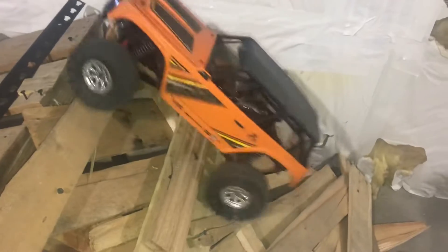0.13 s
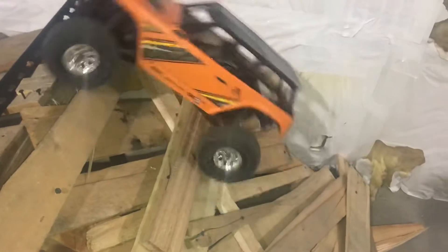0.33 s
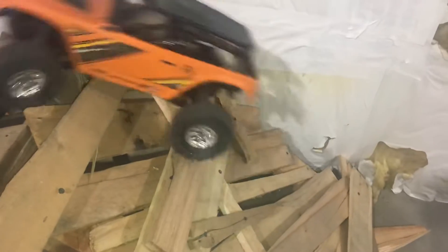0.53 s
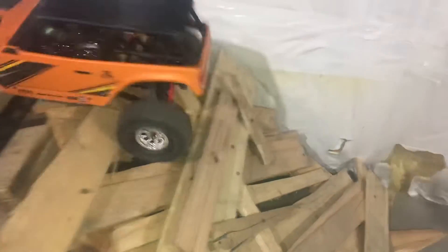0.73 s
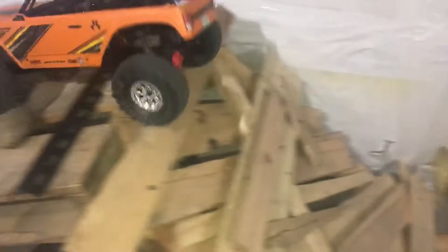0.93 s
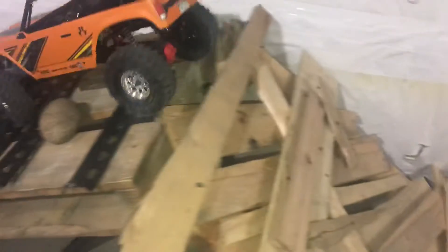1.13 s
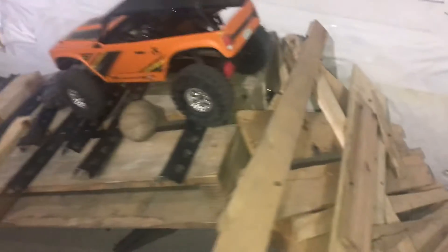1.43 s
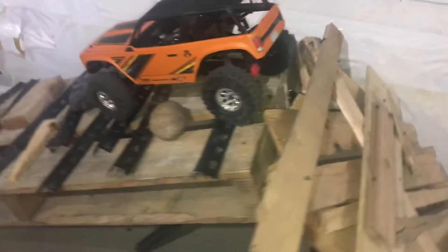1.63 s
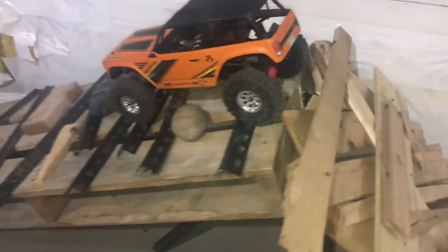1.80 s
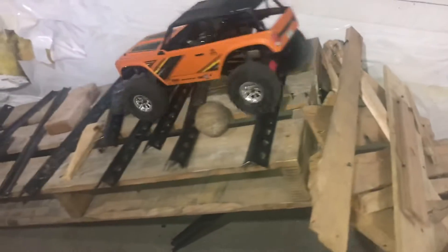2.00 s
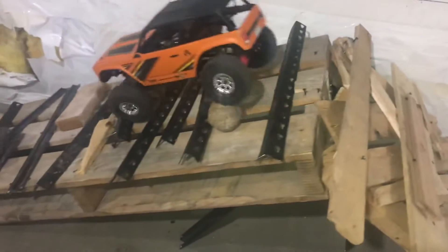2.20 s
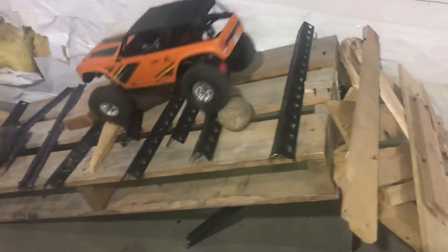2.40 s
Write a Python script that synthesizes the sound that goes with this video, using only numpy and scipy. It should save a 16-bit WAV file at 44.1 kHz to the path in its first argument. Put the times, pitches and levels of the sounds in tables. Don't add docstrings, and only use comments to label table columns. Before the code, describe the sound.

A toy crawler's electric motor and gears whine in rough surges, then wind down amid clattering knocks on wood; after a near-quiet pause, a servo twitches and the motor restarts with more knocks, close in a basement.

```python
import sys
import numpy as np
from scipy import signal
from scipy.fft import rfft, irfft
from scipy.io import wavfile
from scipy.ndimage import uniform_filter1d

SR = 44100
rng = np.random.default_rng(int(sys.argv[2]) if len(sys.argv) > 2 else 0)


def inscribe(sig):
    pcm = np.round(np.clip(np.atleast_2d(sig).T, -1, 1) * 32767)
    wavfile.write(sys.argv[1], SR, pcm.astype(np.int16))


def elevation(decibels):
    levels = np.asarray(decibels, float)
    return 10 ** (levels / 20)


N = 112454
T = np.arange(N) / SR


def evened(x):
    return x / np.sqrt(np.mean(x ** 2) + 1e-20)


def shaped(x, points):
    point_hz, db = np.transpose(points)
    hz = np.fft.rfftfreq(len(x), 1 / SR)
    gain_db = np.interp(np.log(hz + 1), np.log(point_hz + 1), db)
    return irfft(rfft(x) * elevation(gain_db), len(x))


def band(x, lo_hz, hi_hz):
    edges_hz = [lo_hz, min(hi_hz, SR * .49)]
    return signal.sosfilt(signal.butter(2, edges_hz, "bandpass", fs=SR, output="sos"), x)


def resonate(x, peaks):
    return sum(elevation(db) * signal.lfilter(*signal.iirpeak(hz, hz / width, SR), x) for hz, width, db in peaks)


def wander(samples):
    once = uniform_filter1d(rng.standard_normal(N), int(samples))
    return evened(uniform_filter1d(once, int(samples)))


def clicks(per_s, spread_db):
    size = rng.standard_normal(N) * elevation(spread_db * np.minimum(rng.exponential(1, N), 3))
    return size * (rng.random(N) < per_s / SR)


def span(start_s, end_s, fade_s):
    return np.clip(np.minimum(T - start_s, end_s - T) / fade_s, 0, 1)


def add(mix, start_s, sound):
    part = mix[round(start_s * SR):][:len(sound)]
    part += sound[:len(part)]


# centre_s, length_s, whine_db, low_gear_db, low_gear_hz
SURGES = [(.008, 0.014, -23, -23, 1210), (0.033, 0.015, -30, -26, 1150), (0.065, 0.026, -25.5, -29.5, 1190),
          (0.089, 0.0077, -28.5, -27, 1200), (0.153, 0.017, -27, -39, 1180),
          (0.191, 0.033, -28.5, -39, 1120), (.222, 0.027, -56, -39, 1000), (0.26, 0.018, -36, -46, 990),
          (0.282, 0.024, -26.5, -39, 1020), (0.308, 0.012, -31.5, -34.5, 1010),
          (0.357, 0.032, -46, -59, 1010), (0.386, 0.018, -34, -33, 1030),
          (0.414, 0.032, -26.5, -35.5, 1060), (0.452, 0.016, -32, -38.5, 960), (0.474, .015, -50, -39, 930),
          (0.5, 0.016, -27, -40, 1020), (0.533, 0.043, -28.5, -50, 1110),
          (0.582, 0.031, -26.5, -29.5, 1180), (0.676, 0.061, -32, -35.5, 1190),
          (0.715, 0.02, -26, -43, 1150), (0.779, 0.037, -26.5, -31.5, 1215), (0.826, 0.022, -36, -36, 990),
          (0.862, 0.027, -26, -45, 730), (0.927, 0.064, -34, -54, 620), (2.006, 0.029, -46, -61, 620),
          (2.029, 0.02, -30.5, -51, 730), (2.067, 0.034, -42, -54, 820), (2.125, .03, -49, -48.5, 850),
          (2.178, 0.04, -48, -47.5, 870)]
# pitch_hz, level_db
UPPER_ORDERS = [(1500, -14), (2200, -7), (2700, -4.5), (3100, -14), (4600, -22)]


def whine(mesh_hz):
    wobble, rough = .018, .48
    fourth_db, coast_db = -9, -12
    centre_s, length_s, whine_db, low_db, low_hz = np.transpose(SURGES)
    strain = (mesh_hz / 1150) ** 2
    pitches_hz = [mesh_hz, np.interp(T, centre_s, low_hz)] * (1 + wobble * strain * wander(172))
    mesh_phase, low_phase = 2 * np.pi * np.cumsum(pitches_hz, axis=1) / SR
    swing = np.clip((T - centre_s[:, None]) / (2 * length_s[:, None]), -.5, .5)
    bite = np.cos(np.pi * swing) ** 2
    upper = 0
    for order in (3, 4):
        order_db = np.interp(order * mesh_hz, *np.transpose(UPPER_ORDERS)) + (order - 3.5) * fourth_db
        upper = upper + elevation(order_db) * np.sin(order * mesh_phase) * (1 + rough * wander(180))
    coasting = uniform_filter1d(1. * (np.gradient(mesh_hz) < 0), 400)
    upper *= elevation(coast_db * coasting)
    second = np.sin(2 * mesh_phase) * (1 + rough * strain * wander(100))
    low = np.sin(low_phase) * (1 + 1.06 * rough * wander(108))
    return elevation(low_db) @ bite * low + elevation(whine_db) @ bite * (second + upper)


# time_s, mesh_hz, chatter_db
MOTOR = [(0, 1030, -29), (0.056, 1169, -32), (0.142, 1105, -33), (0.5, 1105, -34), (0.58, 1180, -33),
         (0.681, 1179, -33.5), (0.723, 1084, -32), (0.788, 1220, -35.5), (.828, 785, -35),
         (0.999, 499.4, -47), (1.15, 400, -40.5), (1.36, 302, -62.5), (1.819, 297.8, -65.5),
         (1.834, 400, -61), (1.984, 467, -52.5), (2.018, 710.5, -40.5), (2.044, 775, -41.5),
         (2.086, 848, -41.5)]
# pitch_hz, width_hz, level_db
CASE = [(1050, 340, 6), (1500, 140, 1), (2640, 87, -0.5), (5050, 160, -2), (4300, 190, 2), (5750, 220, -2),
        (8500, 330, -7)]
# pitch_hz, density_db [dB per Hz]
CHATTER_COLOUR = [(40, -9.5), (500, -10), (800, -3.5), (1300, 2.5), (3000, 1.5), (6000, -10), (15600, -30)]
# pitch_hz, width_hz, level_db
CHASSIS = [(79.3, 31, 1), (140, 35, 0)]


def drivetrain():
    chatter_db, case_db, clump_db = -2.5, -3.5, 5
    rumble_db, rumble_share, rumble_lag_s = -37, 0.58, 0.094
    time_s, mesh_hz, motor_db = np.transpose(MOTOR)
    load_db = np.interp(T, time_s, motor_db)
    drive = evened(clicks(per_s=1100, spread_db=6.5)) + 2.63 * rng.standard_normal(N)
    clumps = sum(elevation(clump_db * wander(850)) * resonate(drive, [peak]) for peak in CASE)
    chatter = evened(shaped(drive, CHATTER_COLOUR)) + elevation(case_db) * evened(clumps)
    chatter *= elevation(load_db + chatter_db + 0.91 * wander(240))
    late_db = np.interp(T - rumble_lag_s, time_s, motor_db)
    shake = evened(resonate(resonate(rng.standard_normal(N), CHASSIS), CHASSIS))
    rumble = elevation(rumble_db + rumble_share * late_db) * shake
    return chatter + rumble + 1.224 * whine(np.interp(T, time_s, mesh_hz))


# start_s, peak_db, pitch_hz, t60_s
RINGS = [(.003, -27, 1510, 0.1), (.048, -25.5, 1463, 0.1), (.083, -35, 4010, 0.17),
         (.232, -26, 1540, 0.089), (.262, -32.5, 3342, .15), (.316, -24.5, 2903, 0.071),
         (.45, -27, 2040, 0.067), (.66, -33, 3590, 0.097), (1.022, -45, 1450, 0.088),
         (1.04, -29, 2690, 0.07), (1.051, -26, 1137, 0.085), (1.058, -34, 2710, 0.053),
         (1.079, -28, 3550, 0.077), (1.079, -23, 1767, 0.12), (1.091, -23, 1630, .05),
         (1.108, -45, 3480, 0.05), (1.113, -33, 1294, 0.27), (1.114, -32, 1850, 0.061),
         (1.16, -34.5, 879, 0.14), (1.206, -44, 2780, .08), (1.228, -39, 724.5, 0.27),
         (1.826, -51, 1460, 0.089), (1.979, -41, 1470, .12), (2.209, -35, 4183, 0.29),
         (2.208, -34.5, 5023, 0.32), (2.208, -35.5, 5470, .25), (2.212, -30.5, 2933, 0.15),
         (2.212, -29, 3557, 0.17), (2.28, -40, 4280, .15), (2.362, -40, 6220, 0.12),
         (2.365, -37.5, 4120, 0.17), (2.368, -34, 2150, 0.16), (2.412, -30, 4410, .07),
         (2.415, -29, 2046, 0.073), (2.42, -35, 2860, .1), (2.44, -35, 2250, .1), (2.46, -35.5, 4340, 0.18),
         (2.465, -35, 2104, .15), (2.5, -41, 2140, 0.18)]


def rings():
    rise_s, rough = .0025, .5
    out, t = np.zeros(N), T[:SR // 3]
    for start_s, db, hz, t60_s in RINGS:
        buzz = 1 + rough * evened(band(rng.standard_normal(len(t)), 35, 120))
        envelope = elevation(db - 60 * t / t60_s) * (1 - np.exp(-t / rise_s))
        add(out, start_s, envelope * buzz * np.sin(2 * np.pi * hz * t))
    return out


# start_s,
# peak_db, bass_db, treble_db, pitch_hz
KNOCKS = [(.257, -39.5, -34, -1.5, 1060), (.573, -34.5, -6.5, -4.5, 728), (0.612, -32.5, -9, -0.5, 520),
          (.798, -33.5, -9, -7, 1005), (1.036, -28.5, -13.5, -25, 1713), (1.048, -37.5, -32, -34, 1170),
          (1.079, -28.5, -16.5, -15, 1793), (1.113, -39.5, -14, -27, 1305), (1.154, -39, -12, -11, 987),
          (1.206, -32.5, -23, -17, 1503), (1.228, -27.5, -15, -6, 630), (1.27, -37.5, -19, -9, 726),
          (2.071, -37.5, -24.5, -19, 1690), (2.198, -27, -9, -19, 478), (2.206, -24.5, -27, -22, 676),
          (2.216, -23.5, -28, -19, 1650), (2.244, -28, -45, -17, 980), (2.365, -30, -11.5, -18.5, 990),
          (2.414, -29.5, -21, -18, 1288), (2.44, -34, -10, -25, 1006), (2.47, -32.5, -11, -28, 990),
          (2.544, -43, -6, 2, 1016), (1.012, -50, -11, 2, 510), (2.156, -53, -3, 3, 396),
          (2.488, -31.5, -11, -15.5, 892)]
# ratio [to the knock's pitch], level_db, t60_s
WOOD = [(1, 0, .14), (1.52, -6, .09), (2.03, -8, .07)]
# pitch_hz, density_db [dB per Hz]
BLOW = [(240, -1.5), (400, 0), (1530, 8), (1790, 2.5), (2440, 4), (3580, 3), (7000, -7.5), (9100, -18),
        (15400, -120)]


def knocks():
    rise_s, blow_t60_s, bass_t60_s, crack_t60_s = 0.0021, 0.13, 0.16, 0.074
    mode_db, mode_rough = -3.5, .35
    out, t = np.zeros(N), T[:SR // 3]
    rise = 1 - np.exp(-t / rise_s)
    for start_s, db, bass_db, treble_db, hz in KNOCKS:
        scrape, thump, snap = rng.standard_normal((3, len(t)))
        blow = evened(shaped(scrape, BLOW)) * rise * elevation(-60 * t / blow_t60_s)
        buzz = 1 + mode_rough * evened(band(thump, 51, 116))
        modes = sum(elevation(d - 60 * t / t60_s) * np.sin(2 * np.pi * hz * ratio * t) for ratio, d, t60_s in WOOD)
        modes *= elevation(mode_db) * min(hz / 1500, 1) * rise * buzz
        bass = evened(band(thump, 121, 700)) * (1 - np.exp(-t / 0.016))
        bass *= elevation(bass_db + 11 - 60 * t / bass_t60_s)
        crack = evened(band(snap, 3400, 13700)) * rise * elevation(treble_db + 4.0 - 60 * t / crack_t60_s)
        add(out, start_s, elevation(db) * (blow + modes + bass + crack))
    return out


# start_s, peak_db, pitch_hz
TICKS = [(0.451, -23, 2620), (.864, -31, 4520), (0.925, -43.5, 10500), (0.967, -32.5, 3660),
         (1.019, -43, 11800), (1.056, -37, 12300), (1.096, -37.5, 12900), (1.5, -56, 9500),
         (1.542, -60, 9450), (1.568, -57, 5200), (1.611, -59, 3300), (1.828, -55, 3300), (1.857, -53, 5700),
         (.866, -45, 14000)]


def ticks():
    t60_s = 0.026
    out, t = np.zeros(N), T[:SR // 3]
    for start_s, db, hz in TICKS:
        burst = rng.standard_normal(len(t)) * elevation(-60 * t / t60_s * (hz / 5000) ** .5)
        tick = 2.33 * band(burst, hz * 0.77, hz * 1.26) + 0.13 * band(burst, 2500, 13600)
        add(out, start_s, elevation(db) * tick)
    return out


# time_s, level_db
PWM = [
    (.8, -71),
    (.89, -59),
    (1.0, -63),
    (1.2, -76),
    (1.3, -100),
    (1.77, -100),
    (1.79, -73),
    (2.0, -64),
    (2.25, -61),
]


def controller():
    pwm_hz, throb_hz = 8000, 55
    throb = 1 + 0.66 * np.sin(2 * np.pi * throb_hz * T + 1.7 * wander(790))
    level = elevation(np.interp(T, *np.transpose(PWM))) * throb * (1 + .5 * wander(60))
    return level * np.sin(2 * np.pi * pwm_hz * T)


# pitch_hz, width_hz, level_db
CREAK = [(600, 260, 2), (1000, 90, -2), (1250, 120, 0), (1570, 150, 1), (3380, 260, -6)]


def creak():
    slips = clicks(per_s=1500, spread_db=4.4)
    return elevation(-56) * span(1.17, 1.76, 0.16) * evened(resonate(resonate(slips, CREAK), CREAK))


# pitch_hz, width_hz, level_db
SERVO = [(2820, 380, -1), (3660, 720, -0.5), (5360, 420, 4.5), (6090, 130, 14), (6660, 180, -6),
         (9140, 500, -5)]


def servo():
    start_s, peak_s, rise_s, fall_s = 1.636, 1.675, 0.013, 0.014
    level_db, hiss_db, tail_db, tail_s = -42.5, -31, -18.5, 0.1
    gears = rng.standard_normal(N) + 0.51 * evened(clicks(per_s=1000, spread_db=3.4))
    away_s = abs(T - peak_s)
    shape = np.exp(-away_s ** 1.36 / np.where(T < peak_s, rise_s, fall_s) ** 1.12)
    case = evened(resonate(gears, SERVO))
    hiss = elevation(hiss_db) * evened(band(gears, 1500, 9600))
    twitch = (T > start_s) * shape * (case + hiss)
    tail = elevation(tail_db) * np.exp(-away_s / tail_s) * band(case, 2800, 5900)
    return elevation(level_db) * (twitch + tail)


# pitch_hz, width_hz, level_db
STALL = [(880, 260, -3), (1180, 260, -2), (1470, 150, 1)]


def stall():
    level = elevation(-59 + 1.5 * wander(400)) * span(1.826, 2.0, 0.0048)
    grind = clicks(per_s=5000, spread_db=2.1)
    return level * evened(resonate(resonate(grind, STALL), STALL))


def room(x):
    t60_s, level_db = 0.43, -12.5
    t = T[:SR // 2]
    taps = rng.standard_normal(len(t)) * (t > .004)
    dark = band(taps, 76, 2960) * elevation(-60 * t / t60_s)
    bright = 0.77 * band(taps, 1970, 12300) * elevation(-90 * t / t60_s)
    tail = dark + bright
    return elevation(level_db) * signal.fftconvolve(x, tail / np.linalg.norm(tail))[:N]


# pitch_hz, density_db [dB per Hz]
AIR = [(25, 27.5), (70, 13), (600, 14.5), (1600, -16), (5500, -21), (15600, -5)]


def basement_air():
    return elevation(-62 + 0.84 * wander(3300)) * evened(shaped(rng.standard_normal(N), AIR))


def scene():
    near = drivetrain() + rings() + knocks() + ticks() + controller() + creak() + servo() + stall()
    return (near + room(near) + basement_air())[None]


def roll_off(x):
    return signal.sosfilt(signal.butter(12, 15700, fs=SR, output="sos"), x)


def record(dry):
    dry = signal.sosfilt(signal.butter(2, 45, "highpass", fs=SR, output="sos"), dry)
    lowpass = signal.firwin(511, 15750, window=("kaiser", 9), fs=SR)
    dry = signal.oaconvolve(dry, lowpass[None], "same")
    return roll_off(dry)


dry = scene()
out = record(dry)
inscribe(out)
```